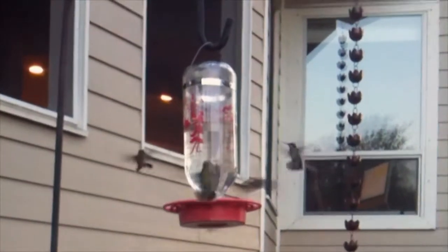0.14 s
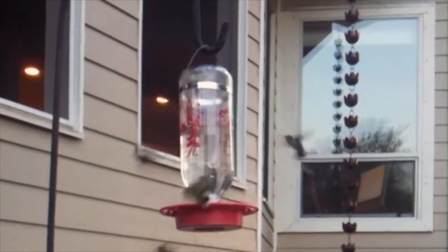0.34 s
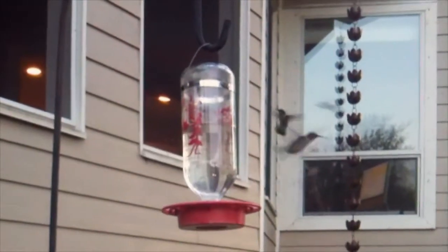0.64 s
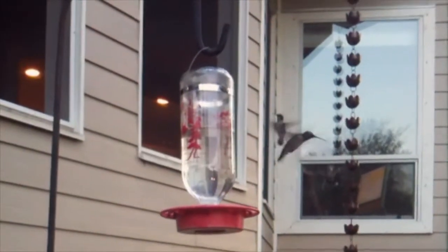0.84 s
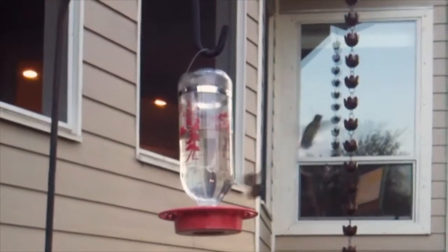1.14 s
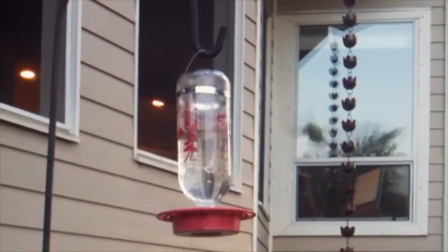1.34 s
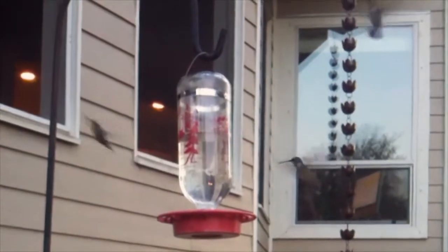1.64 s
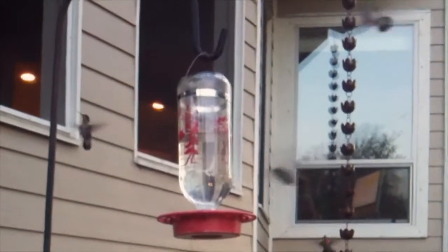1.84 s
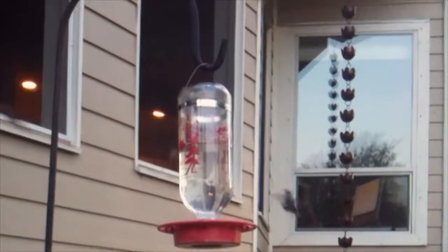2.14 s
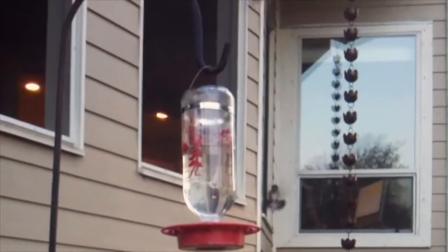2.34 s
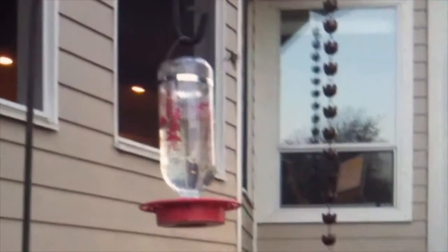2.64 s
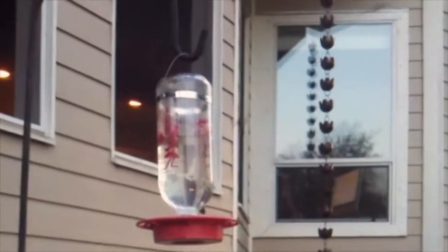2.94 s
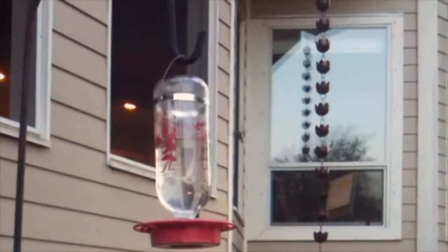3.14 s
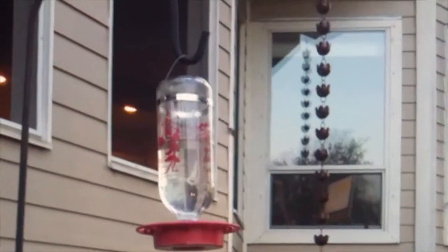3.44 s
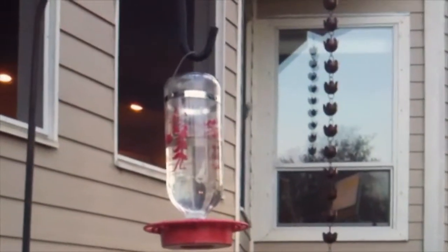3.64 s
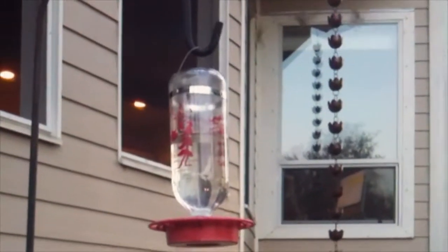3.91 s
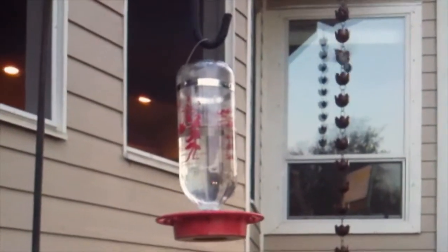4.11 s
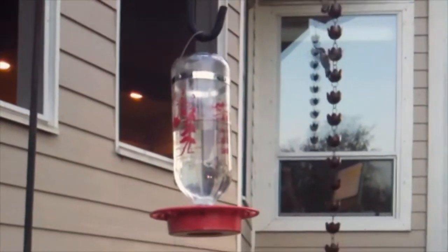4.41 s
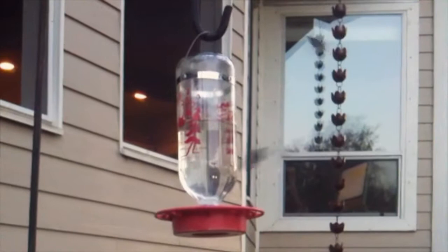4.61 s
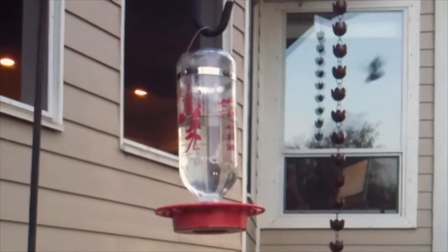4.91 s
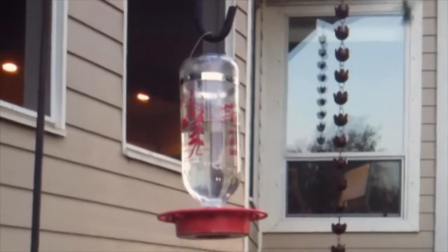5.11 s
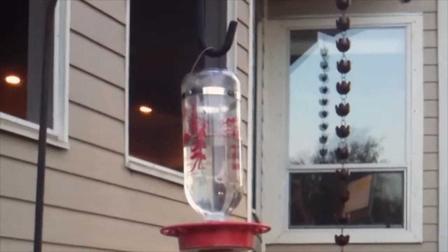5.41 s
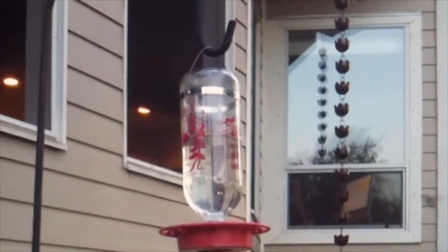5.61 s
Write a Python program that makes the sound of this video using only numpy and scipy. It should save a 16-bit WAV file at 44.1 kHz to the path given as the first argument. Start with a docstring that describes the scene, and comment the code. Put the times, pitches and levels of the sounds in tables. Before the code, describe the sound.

Hummingbird wings hum and swell close by, with thin high squeaks and short buzzy chips over soft outdoor air.

```python
"""Wings hum up close as hummingbirds chase round a feeder, with thin squeaks, falling chips and rustles.
The hum is a stack of wing-beat harmonics, the squeaks are near sines, the chips are buzzy notes coloured
by the beak, and the feathers are flicked hiss. The calls echo off a house wall and the yard.
Behind them a slow motor throbs, a far engine speeds up, insects buzz high and the air rumbles and hisses."""
import sys
import numpy as np
from scipy import signal
from scipy.fft import rfft, irfft
from scipy.io import wavfile

SR = 44100
rng = np.random.default_rng(int(sys.argv[2]) if len(sys.argv) > 2 else 0)


def wav_out(sig):
    """Save sig, one row per channel (or a flat mono array), as 16-bit PCM at SR to the path in sys.argv[1]."""
    wavfile.write(sys.argv[1], SR, np.round(np.clip(np.atleast_2d(sig).T, -1, 1) * 32767).astype(np.int16))


N = 254016
T = np.arange(N) / SR

# Tone of a beating wing. Each row: frequency in Hz, harmonic gain in dB.
WING_SPECTRUM = [(40, -26), (110, -17.5), (160, -7), (205, -0.5), (280, -9), (450, -15.5), (700, -36.5)]
# A bird darts close. Each row: loudest moment in seconds, length in seconds, wing beats per second,
# glide in beats per second, level in dB.
DARTS = [(0.09, 0.33, 50.7, -.5, -52), (0.488, 0.34, 51, 1, -50.5), (.99, 0.17, 49.5, 1, -54),
         (1.199, 0.18, 56, 3, -52.5), (1.35, 0.16, 54, 1, -54), (1.486, 0.11, 51, 0, -53.5),
         (1.619, 0.2, 50, -4.5, -51.5), (1.938, 0.3, 49.2, -1, -51), (2.221, 0.22, 54, 1, -55.5),
         (2.449, 0.342, 60, 1, -48.5), (4.087, 0.25, 55.4, 6, -48.5), (4.521, 0.36, 57.7, 4, -49.5),
         (4.951, 0.65, 50, 0, -54), (5.397, 0.52, 48, 1.5, -58)]
# Fader for the other birds. Each row: time in seconds, level in dB before the trim.
FLOCK_FADER = [(0, -46), (.45, -39.5), (.8, -44), (1.5, -41.5), (2.1, -47), (2.45, -42), (2.9, -50.5),
               (4.5, -45.5), (5.2, -53.5), (5.76, -47)]
# Thin calls. Each row: start, swell and fade in seconds, peak level in dB, pitch in Hz at the start,
# peak and end, octave gain in dB, hoarseness (0 is clear).
SQUEAKS = [(1.848, 0.029, 0.054, -35.5, 7610, 7610, 7400, -13, 0.07),
           (1.955, 0.018, 0.04, -38, 7030, 6980, 7020, -17, 0.17),
           (2.310, 0.027, .015, -41, 6760, 6800, 6200, -15, 0.7),
           (2.328, 0.046, 0.0076, -35, 7280, 7140, 7180, -18, 0.08),
           (2.378, .012, 0.031, -44.5, 7090, 7500, 6600, -22, 0.11),
           (2.718, 0.015, 0.014, -50, 5420, 5500, 6100, -28, 0.6),
           (2.745, 0.028, 0.0155, -34, 6940, 7080, 6700, -18, 0.39),
           (2.774, 0.009, 0.017, -45.5, 6190, 5560, 5080, -5, 1.37),
           (2.789, 0.008, 0.0058, -39, 6200, 6800, 7600, -22, 0.35),
           (2.858, 0.037, 0.018, -53.5, 5300, 5700, 3800, -28, 0.55),
           (4.469, 0.032, 0.043, -34.5, 7530, 7670, 7400, -9, 0.03)]
# Falling calls. Each row: start in seconds, level in dB before the trim, starting pitch in Hz,
# harmonic roll-off in dB per octave (negative is brighter).
CHIPS = [(.264, -39.5, 2464, 4), (.449, -39.5, 2135, -2.5), (0.769, -44, 1630, 0.5), (1.101, -47, 2210, -2),
         (1.52, -49, 2293, -3), (1.607, -43, 2308, 6), (2.011, -42, 2395, -4), (2.084, -39.5, 2620, -5),
         (2.184, -41.5, 2190, 1.5), (2.249, -47, 2170, -5), (2.345, -39.5, 1982, -1),
         (2.535, -38.5, 4220, -6), (2.587, -39, 4160, -5), (2.643, -39, 4220, -6),
         (2.912, -38.5, 2620, -12), (2.994, -41, 2350, -12), (3.053, -40, 2324, -9),
         (3.116, -40.5, 2352, -9), (3.19, -39.5, 2400, -14), (3.279, -43.5, 2410, -12),
         (3.447, -47, 2330, -8), (3.603, -39, 1884, 1), (3.679, -47, 2210, 6), (3.77, -47.5, 2437, -6),
         (3.854, -44, 2060, 2.5), (3.903, -48, 2306, 0), (3.984, -48, 2272, 3), (4.245, -47, 2530, -5),
         (4.68, -44, 2184, 2.5), (4.952, -45.5, 2202, 2), (5.456, -44, 2207, 4)]
# Colour of the open beak. Each row: frequency in Hz, gain in dB.
BEAK_SPECTRUM = [(1500, 2.5), (3000, 0), (5000, 3.5), (8000, 4), (10500, -10), (16000, -22)]
# Birds clash. Each row: start and length in seconds, base level in dB, tilt (higher thins the mids),
# gain at 16 kHz in dB.
RUSTLES = [(0.243, 0.16, -51, 1, -8), (1.235, 0.045, -50.5, 0, -29), (2.439, 0.059, -47, 6, -16),
           (5.424, 0.058, -56, 0.5, -25)]
# Motor hum. Each entry: multiple of the turning rate, level in dB.
MOTOR_LINES = dict([(6, -69), (8, -53), (10, -66), (34, -66), (35, -67), (36, -58), (37, -62), (38, -70),
               (39, -65.5), (40, -70), (41, -66), (42, -70), (43, -73), (44, -73)])
# Fading motor whine. Each row: time in seconds, levels in dB of the 75th and 50th multiples.
MOTOR_WHINE = [(0, -70.5, -67), (2.8, -68, -66), (3.6, -67.5, -78), (4.0, -76, -73), (5.76, -85, -71)]
# The far engine's run. Each row: time in seconds, firings per second, level in dB.
ENGINE_RUN = [(3.55, 22, -76), (4.25, 31.2, -63), (4.85, 39.2, -58), (5.08, 40.9, -63), (5.3, 37, -67)]
# Tone of the exhaust. Each row: frequency in Hz, harmonic gain in dB.
EXHAUST_SPECTRUM = [(220, -28), (300, 1), (360, -13), (430, 0.5), (510, -0.5), (590, -8.5), (670, -6),
                    (900, -37)]
# Insect resonances. Each row: centre in Hz, width in Hz, relative level in dB.
INSECT_BANDS = [(8706, 230, -8), (8910, 550, 3), (9360, 1040, -5)]
# Soft bands of hiss. Each row: centre in Hz, width in Hz, opening and closing levels in dB.
HISS_BANDS = [(1485, 106, -68.5, -76), (2217, 124, -71.5, -71), (3576, 370, -67, -71.5)]
# Colour of the outdoor air. Each row: frequency in Hz, relative level in dB.
AIR_SPECTRUM = [(60, -10), (100, -4.5), (150, 2.5), (250, -4), (450, -7), (600, -8), (800, -6),
                (1200, -13.5), (2200, -18), (2900, -19), (7000, -18), (11000, -21.5), (15500, -25.5)]


def wings():
    """Each dart swells and dies on its own gliding beat; six more birds wander round 53 beats a second."""
    peak_s, length, beats, glide, level_db = np.transpose(DARTS)
    glide_times = np.ravel([peak_s - length / 4, peak_s + length / 4], "F")
    glide_rates = np.ravel([beats - glide / 2, beats + glide / 2], "F")
    beat_hz = np.interp(T, glide_times, glide_rates)
    swells = sum(amp(db) * np.cos(np.pi * np.clip((T - at) / span, -.5, .5))
                 for at, span, db in zip(peak_s, length, level_db))
    darts = swells * harmonics(beat_hz, WING_SPECTRUM, wobble=.006, flicker_db=1.2, count=14)
    flock, trim_db = np.zeros(N), -7.5
    for bird in range(6):
        sway = amp(2.3 * drift(2.3))
        flock += sway * harmonics(53 + 5 * drift(1.2), WING_SPECTRUM, wobble=.04, flicker_db=4.5, count=11)
    return darts + amp(automation(FLOCK_FADER)[0] + trim_db) * unit_rms(flock)


def squeaks():
    """Near sines with an octave; hoarseness grows through each note, shaking pitch and level."""
    onset_s, release_s = .004, .016
    edge_db, shoulder_db, faded_db = -25, -10.5, -13.5   # relative to the peak
    out = np.zeros(N)
    for start, swell, fade, peak_db, first_hz, peak_hz, last_hz, octave_db, hoarse in SQUEAKS:
        knees = np.cumsum([0, min(onset_s, swell / 2), max(swell - onset_s, swell / 2), fade, release_s])
        at, t = round(start * SR), T[:round(knees[-1] * SR)]
        level_db = peak_db + np.interp(t, knees, [edge_db, shoulder_db, 0, faded_db, edge_db])
        envelope = np.sqrt(2) * signal.windows.tukey(len(t), .1) * amp(level_db)
        pitch = np.interp(t, [0, knees[2], knees[3]], [first_hz, peak_hz, last_hz])
        rasp = hoarse * (.4 + .77 * t / knees[-1])
        phase = 2 * np.pi * np.cumsum(pitch * (1 + .05 * rasp * drift(400, len(t)))) / SR
        shake = 1 + rasp * drift(440, len(t))
        out[at:at + len(t)] += envelope * shake * (np.sin(phase) + amp(octave_db) * np.sin(2 * phase))
    return out


def chips():
    """Buzzy, breathy notes that drop in pitch and dull as the beak closes."""
    length_s, drop_per_khz, jitter, trim_db = .021, .11, .04, -8.5
    out, breath = np.zeros(N), shaped_noise(BEAK_SPECTRUM)
    size = round(length_s * SR)
    progress = np.linspace(0, 1, size)
    envelope = np.sin(np.pi * progress ** .57)
    for start, level_db, hz, rolloff_db in CHIPS:
        at = round(start * SR)
        rasp = np.clip(.7 - rolloff_db / 8, .5, 1) if hz < 3000 else .75   # low chips rasp more if bright
        fall = 1 - drop_per_khz * hz / 1000 * progress ** .7   # fast at first; higher notes fall further
        pitch = hz * fall * (1 + jitter * rasp * drift(600, size))
        phase = 2 * np.pi * np.cumsum(pitch) / SR
        slope_db = rolloff_db + (1 - rasp) * (progress - 1.4)
        buzz = np.zeros(size)
        for k in range(1, int(SR / 2 / hz) + 1):
            gain_db = db_at(BEAK_SPECTRUM, k * pitch) - slope_db * np.log2(k) + 1.7 * drift(120, size)
            buzz += amp(gain_db) * np.sin(k * phase + rng.uniform(0, 6.6))
        note = unit_rms(buzz) + .75 * rasp * breath[at:at + size]
        out[at:at + size] += amp(level_db + trim_db) * envelope * note
    return out


def rustles():
    """Feathers brush once a wing beat, flicking a short swell of hiss."""
    beat_hz, decay_beats, flick_db = 59, .55, 6
    out = np.zeros(N)
    for start, length, level_db, tilt, top_db in RUSTLES:
        at, t = round(start * SR), T[:round(length * SR)]
        swell = np.sin(np.pi * (t / length) ** .86) ** .38
        flick = np.exp(-((t * beat_hz) % 1) / decay_beats)
        hiss = shaped_noise([(500, -21), (1300, -2.5 * tilt), (8000, 1.5), (16000, top_db)], len(t))
        flutter = amp(level_db - 3 + flick_db * flick + 2 * drift(70, len(t)))
        out[at:at + len(t)] += flutter * swell * hiss
    return out


def wall_echoes(send, t60_s=.21, predelay_s=.006):
    """Many short echoes from house and yard, duller than the direct sound and dying away."""
    t = T[:round(t60_s * SR)]
    tail = rng.standard_normal(len(t)) * amp(-60 * t / t60_s) * (t > predelay_s)
    dull_tail = signal.lfilter([1, .7], [1], tail)
    return signal.fftconvolve(send, dull_tail / np.sqrt(np.sum(dull_tail ** 2)))[:N]


def motor(turn_hz=19.895, lead_s=.01):
    """One knock per turn rings the housing; phase shifts across its resonance, so the hum throbs."""
    phase = 2 * np.pi * turn_hz * (T + lead_s)
    hum = np.zeros(N)
    for k, db in MOTOR_LINES.items():
        housing_lag = 2.58 * np.arctan(k - 37.5)
        hum += amp(db + .63 * drift(4.2)) * np.cos(k * phase - housing_lag + .35 * drift(.87))
    whine = sum(amp(db + .8 * drift(3)) * np.cos(k * phase + (k < 60) * drift(3))   # the lower line wavers
                for k, db in zip([75, 50], automation(MOTOR_WHINE)))
    stray_tone = amp(-67 + 2.3 * drift(1.4)) * np.cos(2 * np.pi * 725.4 * T)   # beats against the hum
    return np.sqrt(2) * (hum + whine + stray_tone)


def engine():
    """A far engine speeds up and eases off, one exhaust pulse per firing."""
    firing_hz, level_db, gate = automation(ENGINE_RUN)
    exhaust = harmonics(firing_hz, EXHAUST_SPECTRUM, wobble=.002, flicker_db=3.6, count=24)
    return gate * amp(level_db) * exhaust


def insects(pulse_hz=61.37, level_db=-57):
    """One singer's short regular pulses over a blur of others, in narrow high resonances."""
    pulses = np.exp(-((T * pulse_hz + .1 * drift(1)) % 1) / .07)
    drive = rng.standard_normal(N) * (1 + 1.3 * pulses) * amp(drift(8.2))
    song = sum(amp(db) * band(drive, hz, width) for hz, width, db in INSECT_BANDS)
    return amp(level_db) * unit_rms(song)


def hiss_bands():
    """Three faint bands of noise waver; the lowest and highest slowly fade."""
    white = rng.standard_normal(N)
    return sum(amp(first_db + (last_db - first_db) * T / T[-1] + .79 * drift(7.2)) * band(white, hz, width)
               for hz, width, first_db, last_db in HISS_BANDS)


def air(level_db=-51.5, sway_db=.5):
    """Outdoor air: a gently swaying bed of rumble and hiss."""
    return amp(level_db + sway_db * drift(4.1)) * shaped_noise(AIR_SPECTRUM)


def harmonics(rate_hz, spectrum, wobble, flicker_db, count):
    """Harmonics of a wobbling beat, each flickering on its own."""
    step = 16   # built at SR / step, which slows both drifts by the same factor
    rate_hz = rate_hz[::step] * (1 + wobble * drift(104.1, len(T[::step])))
    phase = 2 * np.pi * np.cumsum(rate_hz) * step / SR
    tone = np.zeros(len(phase))
    for k in range(1, count + 1):
        gain_db = db_at(spectrum, k * rate_hz) + flicker_db * drift(214, len(phase))
        tone += amp(gain_db) * np.sin(k * phase + rng.uniform(0, 6.86))
    return np.sqrt(2) * signal.resample_poly(tone, step, 1)[:N]


def shaped_noise(spectrum, size=N):
    """White noise shaped to a spectrum, at rms 1."""
    hz = np.maximum(np.arange(size // 2 + 1) * SR / size, 1)
    return unit_rms(irfft(rfft(rng.standard_normal(size)) * amp(db_at(spectrum, hz)), size))


def band(x, hz, width_hz):
    """Two passes through a two-pole resonance, at rms 1."""
    r = np.exp(-np.pi * width_hz / SR)
    b = np.array([1, 0, -1]) * (1 - r * r) / 2
    a = [1, -2 * r * np.cos(2 * np.pi * hz / SR), r * r]
    return unit_rms(signal.lfilter(b, a, signal.lfilter(b, a, x)))


def drift(rate_hz, size=N):
    """Smooth random modulation, at about rms 1."""
    r = np.exp(-2 * np.pi * rate_hz * 8 / SR)
    slow = signal.lfilter([1], [1, -2 * r, r * r], rng.standard_normal(size // 8 + 4002))[4000:]
    return np.interp(np.arange(size) / 8, np.arange(len(slow)), unit_rms(slow))


def automation(rows):
    """A curve for each column after the time, then a gate that is open over the table's span."""
    times, *columns = np.transpose(rows)
    gate = np.clip(np.minimum(T - times[0], times[-1] - T) / .004, 0, 1)
    return [np.interp(T, times, column) for column in columns] + [gate]


def db_at(spectrum, hz):
    """A spectrum read on a log-frequency axis."""
    points_hz, points_db = np.transpose(spectrum)
    return np.interp(np.log(hz), np.log(points_hz), points_db)


def amp(db):
    """Gain of a dB value."""
    return 10 ** (np.asarray(db) / 20)


def unit_rms(x):
    """Scaled to rms 1."""
    return x / np.sqrt(np.mean(x ** 2) + 1e-20)


def scene():
    """Only the calls feed the echo; the chipping birds are further off, so they send more."""
    near, far = squeaks(), chips()
    echoes = wall_echoes(amp(-9) * near + amp(-7) * far)
    bed = air()
    birds = near + far + echoes + rustles() + wings()
    return (birds + engine() + motor() + hiss_bands() + insects() + bed)[None]


def record(dry):
    """The microphone drops the deep bass; the top is cut at 16 kHz."""
    thin = signal.sosfilt(signal.butter(3, 95, "high", fs=SR, output="sos"), dry)
    return signal.sosfilt(signal.cheby2(24, 70, 16000, fs=SR, output="sos"), thin)


dry = scene()
out = record(dry)
wav_out(out)
```